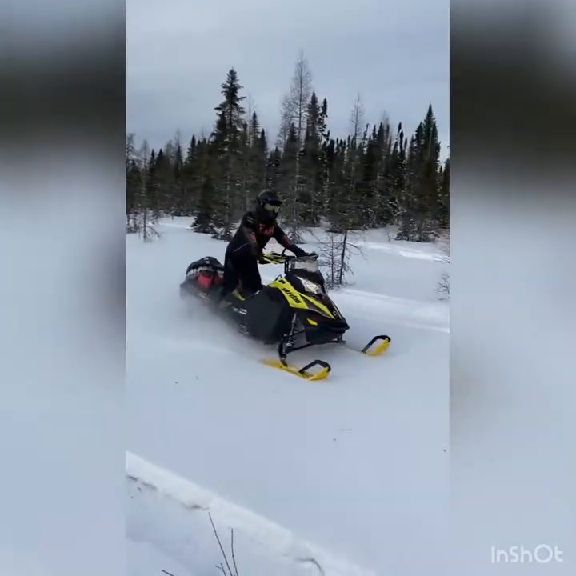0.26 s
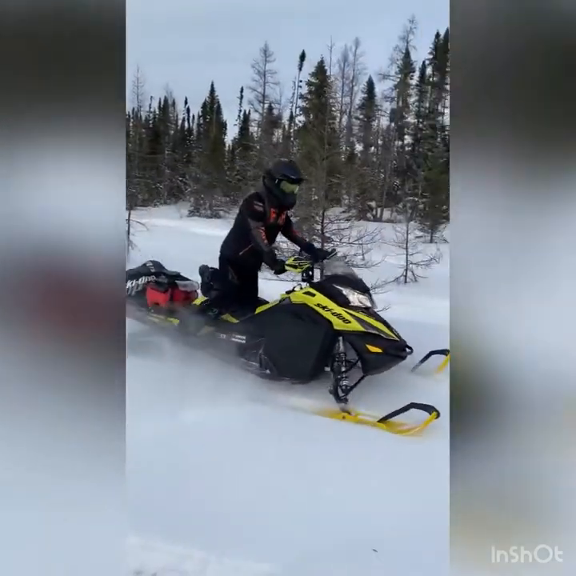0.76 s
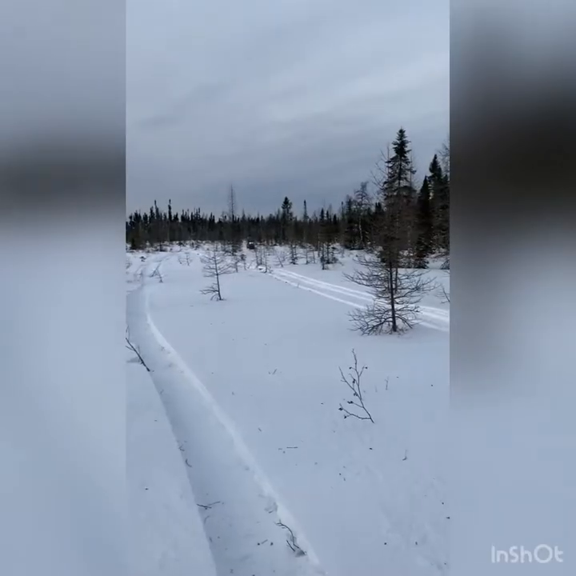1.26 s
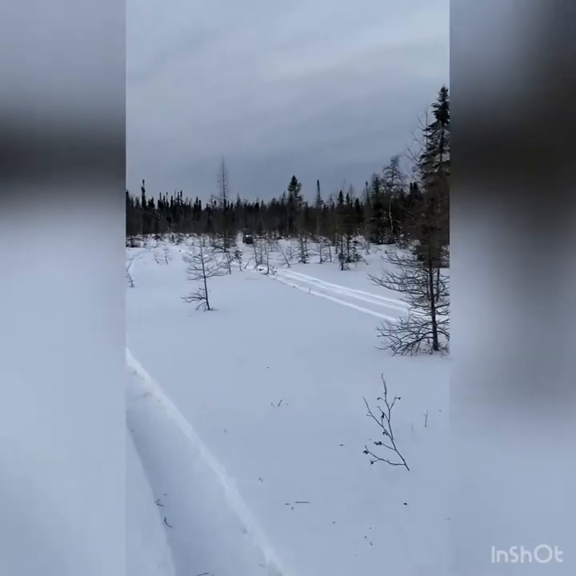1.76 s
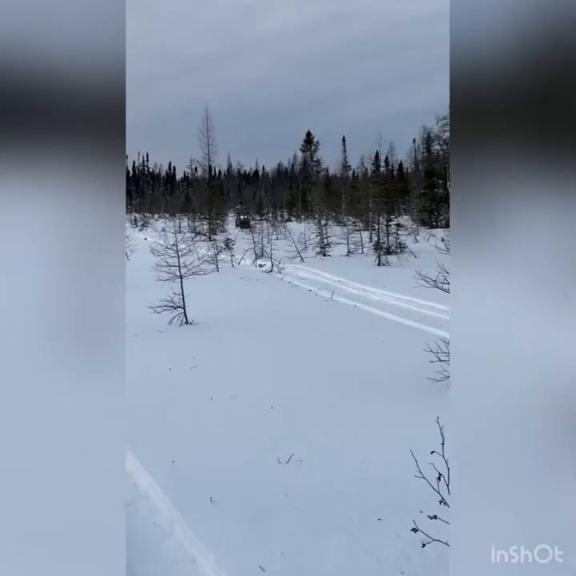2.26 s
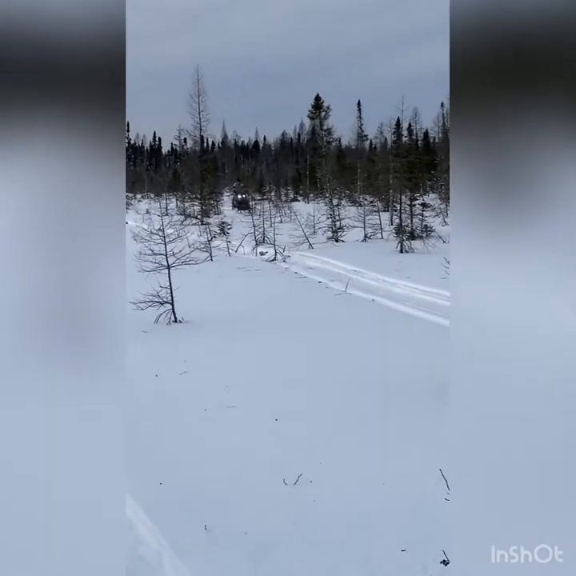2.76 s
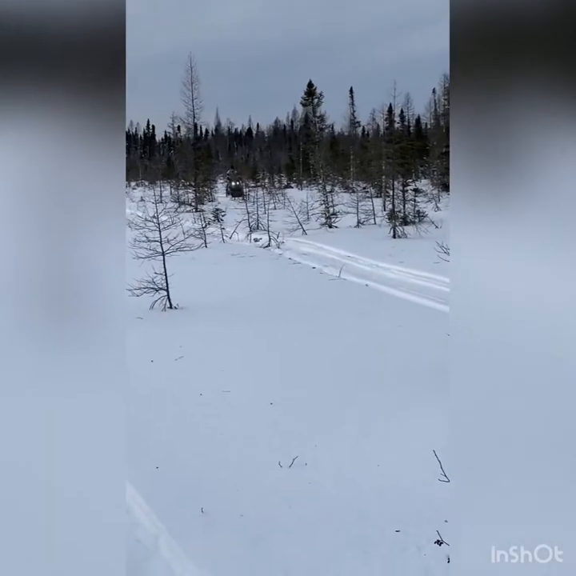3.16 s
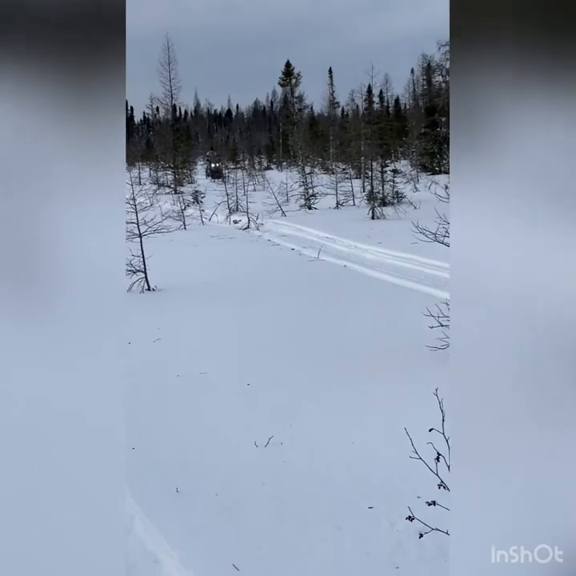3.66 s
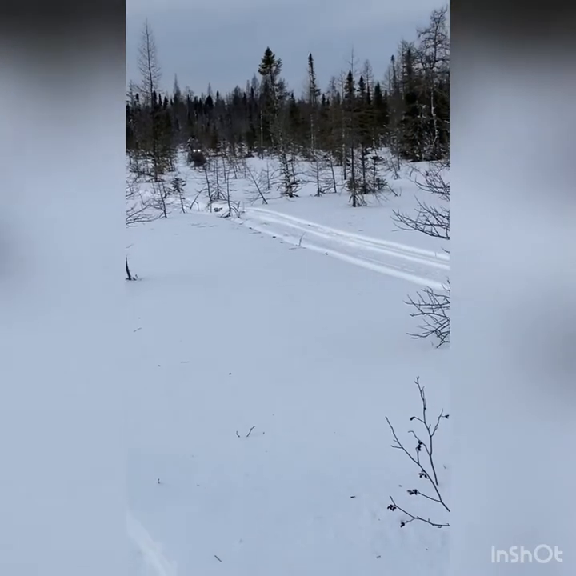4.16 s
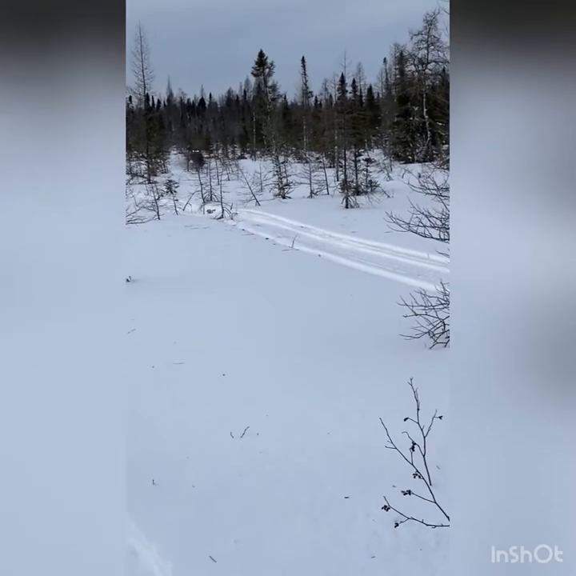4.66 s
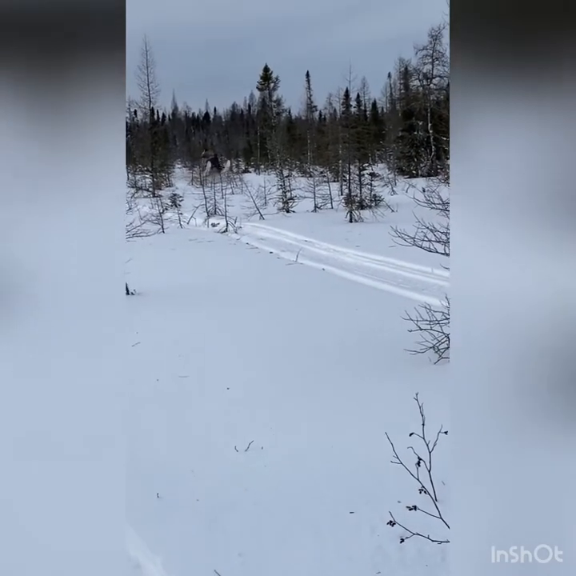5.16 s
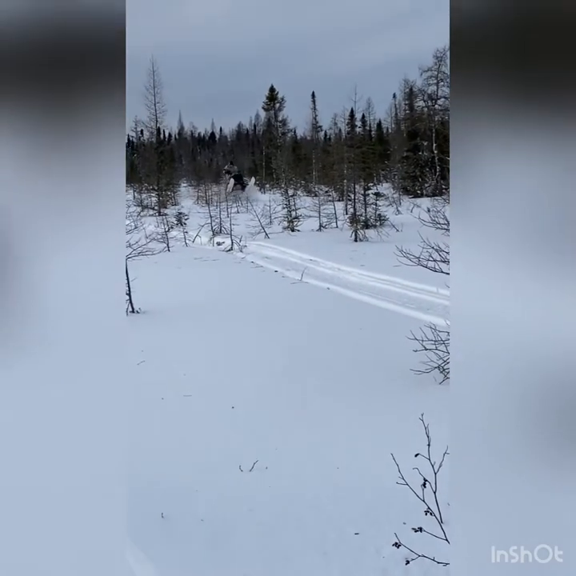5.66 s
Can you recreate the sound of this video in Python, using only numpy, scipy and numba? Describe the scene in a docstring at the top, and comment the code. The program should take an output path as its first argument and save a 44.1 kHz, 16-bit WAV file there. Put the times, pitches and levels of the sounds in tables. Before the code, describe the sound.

Handheld phone stereo in an open snowy forest clearing. From 0 to 0.9 s a snowmobile coasts by, fairly quiet: uneven low engine burble, soft rumble of track churning snow, and a faint lug whine that dips in pitch. At 0.91 s it cuts dead and a second sled idles right beside the microphones, around forty firings a second, hunting slightly: deep muffler thuds, metallic panel rattle and broad clatter, a dull bump just after the cut, scattered loose clacks until about 4.2 s, another bump near 4.8 s. Faint distant track hiss grows. Around 4.5 s the far sled comes on throttle, its pitch climbing quickly then holding as a swelling, loud, bright two-stroke howl with gritty rasp, bursts of flung snow and belt scream, while phone gain pushes the idle down. At 5.64 s the throttle snaps shut; pitch and level drop quickly, leaving a dull forest echo and the subdued idle to the end near 6 s.

```python
"""A snowmobile coasts past in deep snow: an uneven engine burble under track rumble and a faint lug whine.
Abruptly it is gone and a second sled idles right beside the phone's two microphones: firings thud in
the muffler and rattle the panels, with loose clacks and two dull bumps. Then, far off at the tree line,
the first sled opens the throttle, howls for about a second on its tuned pipe with rasp, flung snow and
belt scream, and drops away; the forest echoes it. The phone turns its gain down under the howl."""
import sys
import numpy as np
from scipy import signal
from scipy.fft import rfft, irfft, next_fast_len
from scipy.io import wavfile
from scipy.ndimage import uniform_filter1d
from numba import njit

SR = 44100
rng = np.random.default_rng(int(sys.argv[2]) if len(sys.argv) > 2 else 0)


def inscribe(sig):
    """Save sig as 16-bit PCM at rate SR to the path in sys.argv[1].

    A 1-D sig is mono; a 2-D sig holds one channel per row.
    Samples are clipped to [-1, 1] before scaling.
    """
    pcm = np.round(np.clip(np.atleast_2d(sig).T, -1, 1) * 32767)
    wavfile.write(sys.argv[1], SR, pcm.astype(np.int16))


N = 261057
T = np.arange(N) / SR  # s

CUT_S = .910  # the coasting sled stops, the idling one starts
SONG_S, SHUT_S = 4.497, 5.64  # far sled: its pipe comes on song, its throttle snaps shut
SIDES = np.array([[1], [-1]])  # left, right


def undb(db):
    """Decibels to gain."""
    return 10 ** (np.asarray(db) / 20)


def unit(x):
    """Scale to rms 1."""
    return x / np.sqrt(np.mean(x ** 2))


def curves(table):
    """Each column of a table, joined by straight lines in time."""
    s, *columns = np.transpose(table)
    return [np.interp(T, s, column) for column in columns]


def noise():
    """White noise."""
    return rng.standard_normal(N)


def walk(rate):
    """Smooth random wander with rms 1: noise averaged twice over 1/rate seconds."""
    k = int(SR / rate)
    once = uniform_filter1d(noise(), k, mode="wrap")
    return unit(uniform_filter1d(once, k, mode="wrap"))


def colour(x, points, size=16384):
    """Causal minimum-phase filter through (f/Hz, level/dB) points."""
    hz, db = np.transpose(points)
    bins_hz = np.arange(size // 2 + 1) * SR / size
    log_gain = np.log(undb(np.interp(np.log(bins_hz + 1), np.log(hz), db)))
    # folding the cepstrum puts the energy as early as it can be
    cepstrum = irfft(log_gain)[:size // 2]
    cepstrum[1:] *= 2
    impulse = irfft(np.exp(rfft(cepstrum, size)))
    return signal.fftconvolve(x, impulse)[:N]


def resonate(x, hz, width):
    """One resonance, gain 1 at its centre."""
    return signal.lfilter(*signal.iirpeak(hz, hz / width, fs=SR), x)


def burst(age, decay):
    """Envelope that starts at age 0 and dies away."""
    return (age >= 0) * np.exp(-np.abs(age) / decay)


def buzz(hz, count):
    """Steady firing pulses as a stack of equal harmonics, and their phase."""
    phase = 2 * np.pi * np.cumsum(hz) / SR
    return sum(np.cos(k * phase) for k in range(1, count + 1)), phase


def surround(envelope, spectrum):
    """Coloured noise at the two microphones: a direct part in both, a diffuse part opposed between them."""
    # share that arrives from all around: f/Hz, level/dB
    all_around = [(60, -35), (150, -6), (380, -8), (700, 3.5), (1300, -3), (2400, -3), (5000, -28.5),
                  (12000, -36)]
    direct, diffuse = (unit(colour(noise() * envelope, spectrum)) for _ in range(2))
    return direct + SIDES * colour(diffuse, all_around)


def coasting_sled():
    """Off the throttle the engine burbles unevenly under the track's rumble, whose lugs whine faintly."""
    # mean firing rate: t/s, f/Hz
    firing_rate = [(0, 62.45), (.25, 58.07), (.38, 61.54), (.48, 59.86), (.6, 61.87), (.9, 61)]
    # muffled exhaust: f/Hz, relative level/dB
    exhaust_tone = [(50, -30.5), (120, -5.5), (180, -0.5), (240, -11), (400, -26.5), (620, -30), (800, -40),
                    (2000, -32)]
    # track churning the snow: f/Hz, relative level/dB
    churn = [(25, -16), (50, 1), (120, 2), (200, 3), (320, -8.5), (600, -17), (850, -24.5), (1500, -24.5),
             (3200, -36.5), (5500, -33.5), (10000, -35.5), (16000, -52)]
    # lugs passing, lower in pitch as the sled goes by: t/s, f/Hz
    lug_rate = [(0, 123), (.1, 121), (.3, 107.5), (.42, 99), (.5, 98), (.62, 100.5), (.9, 103.5)]
    # tunnel ringing around the lugs: f/Hz, relative level/dB
    tunnel = [(150, -16), (300, 2), (400, -4), (500, -0.5), (610, 1.5), (720, -7), (850, -14), (1200, -28)]

    hz, = curves(firing_rate)
    pulses, _ = buzz(hz * (1 + 0.013 * walk(12.6)), count=24)
    exhaust = unit(colour(pulses * undb(2.0 * walk(71)), exhaust_tone))
    track = surround(undb(1.4 * walk(25)), churn)
    lugs, _ = buzz(*curves(lug_rate), count=9)
    whine = unit(colour(lugs, tunnel)) * undb(1.5 * walk(20))
    mix = undb(-0.5) * exhaust + undb(-0.5) * track + undb(-14.0) * whine
    return mix * undb(-37.5) * (T < CUT_S)


def idling_sled():
    """Every firing thuds in the muffler, then strikes the panels, each after its own lag."""
    # hunting around the idle speed: t/s, firing f/Hz
    idle_rate = [(0.91, 38.68), (1.13, 39.68), (1.64, 40.49), (1.77, 38.14), (2.14, 40.24), (2.75, 38.82),
                 (2.87, 37.14), (3.07, 40.8), (3.15, 38.47), (3.68, 40.22), (3.69, 40.6), (4.1, 40.3),
                 (5.29, 39.5), (5.65, 37.53), (5.72, 39.9), (5.92, 37.63)]
    # muffler and airbox modes: f/Hz, width/Hz, signed relative gain
    modes = [(44.3, 5.3, 0.25), (111.7, 18.4, 0.36), (170.4, 198, -0.19)]
    # panels and clutch: f/Hz, width/Hz, relative level/dB, lag after the firing/s, lag scatter/s
    panels = [(838.5, 42, -11, .0105, 0.0005), (1027, 163, -14.5, 0.012, 0.00065),
              (1689, 94, -7, .0095, .0004), (2657, 85, -10, .0145, .0006),
              (2553, 270, -14.5, 0.01, 0.00043), (3906, 120, -23.5, 0.0063, 0.00058),
              (4570, 230, -23.5, 0.012, 0.00039)]
    # broad mechanical clatter: f/Hz, relative level/dB
    clatter = [(25, -20), (55, 19.5), (100, 23.5), (200, 20), (350, 4.5), (600, 2.5), (1100, -3.5),
               (1500, -6.5), (2200, -8.5), (3200, -10.5), (4500, -18), (6000, -16.5), (8000, -20.5),
               (11000, -27.5), (16000, -42)]
    thud_db, rattle_start_db, rattle_growth_db_per_s = -13, -34, 0.43
    # the ringing moves from the thin panel to the two low ones; the low ones get the opposite dB
    shift_s, thin_before_db, thin_after_db = 3.33, 1.3, -3.5

    hz, = curves(idle_rate)
    rattle_db = rattle_start_db + rattle_growth_db_per_s * (T - CUT_S)
    thin_db = uniform_filter1d(np.where(T < shift_s, thin_before_db, thin_after_db), size=SR // 6)
    turns = np.cumsum(hz * (T >= CUT_S)) / SR
    fired = np.flatnonzero(np.diff(np.ceil(turns))) + 1  # sample of each firing
    # the two cylinders differ a little, and no two firings are alike
    force = rng.standard_normal(len(fired)) + 0.59 * (-1) ** np.arange(len(fired))

    def firings(lag, jitter, spread_db):
        """One pulse for each firing, a little late."""
        late = np.abs(lag + jitter * rng.standard_normal(len(fired)))
        return np.bincount(fired + (late * SR).astype(int), undb(spread_db * force), 2 * N)[:N]

    def flare(pulses, decay):
        """Each pulse dies away."""
        return signal.lfilter([1], [1, -np.exp(-1 / (decay * SR))], pulses)

    low_pass = signal.butter(8, 216, fs=SR, output="sos")
    puffs = signal.sosfilt(low_pass, firings(lag=0.00007, jitter=0.00004, spread_db=.5))
    thud = unit(sum(gain * resonate(puffs, centre, width) for centre, width, gain in modes))

    shake = flare(firings(lag=.0075, jitter=.0003, spread_db=1.0), decay=.025)
    steady = 0.24 * (T >= CUT_S)
    rattle = undb(7.0) * surround(steady + shake, clatter)
    for k, (centre, width, db, lag, jitter) in enumerate(panels):
        blows = firings(lag, jitter, spread_db=1.0)
        chatter = 0.069 * noise() * flare(blows, decay=0.0072)
        ring = resonate(resonate(blows + chatter, centre, width), centre, 5 * width)
        lean = (k == 2) - (k < 2)  # thin panel +1, the two low ones -1
        rattle = rattle + unit(ring) * undb(db + thin_db * lean)
    return thud * undb(thud_db) + rattle * undb(rattle_db)


def knocks():
    """Loose parts clack in short noise bursts; twice something bumps dully as a dying sine."""
    # harder clacks: t/s, relative level/dB
    clack_times = [(1.0454, -28), (1.775, -29), (1.878, -28), (2.2832, -28.5), (2.4334, -29), (2.559, -27),
                   (2.583, -30), (2.61, -30), (2.7638, -26.5), (2.8956, -33), (2.9727, -27), (3.051, -29),
                   (3.228, -26.5), (3.28, -25), (3.481, -21), (4.0085, -23.5), (4.1077, -24),
                   (4.228, -21.5)]
    # dull bumps: t/s, level/dB, f/Hz
    bump_times = [(.929, -12, 327), (4.814, -10.5, 302)]
    tone = [(300, -4), (900, 11.5), (2500, 6.5), (4500, -1.5), (7000, -9), (16000, -35)]  # f/Hz, level/dB

    chatter = unit(colour(noise(), tone))
    clacks = sum(undb(db) * burst(T - s, 0.01) for s, db in clack_times) * chatter
    bumps = sum(undb(db) * burst(T - s, 0.0033) * np.sin(2 * np.pi * hz * (T - s))
                for s, db, hz in bump_times)
    return undb(-5.0) * clacks + bumps


def rev_rate():
    """The engine runs up until the clutch holds it, and runs down once the throttle shuts."""
    # speed where the clutch holds, swaying as the track slips and grips: t/s, firing f/Hz
    clutch_rate = [(4.68, 275.9), (4.88, 279.5), (5.05, 277.8), (5.15, 282), (5.25, 276.1), (5.32, 282.3),
                   (5.43, 281.9), (5.55, 277.4), (5.635, 278.8)]
    cruise_hz, run_up_from_s, run_up_hz_per_s = 164.7, 4.31, 340
    knee_hz = 7  # softness of the clutch's hold
    run_down_to_hz, run_down_s = 132.8, 0.17

    held, = curves(clutch_rate)
    free = cruise_hz + run_up_hz_per_s * np.maximum(T - run_up_from_s, 0)
    driven = held - knee_hz * np.logaddexp(0, (held - free) / knee_hz)  # soft minimum of the two
    run_down = np.exp(-np.maximum(T - SHUT_S, 0) / run_down_s)
    return run_down_to_hz + (driven - run_down_to_hz) * run_down


def throttle(full_db, below_db, swell_s):
    """Gain that comes in fast, swells from below_db under full, drops as the throttle shuts, then fades."""
    open_db_per_s = 190
    shut_drop_db, shut_drop_s, fade_db_per_s = 15, 0.033, 82

    early, on, off = (np.maximum(age, 0) for age in (SONG_S - T, T - SONG_S, T - SHUT_S))
    swell_db = -below_db * np.exp(-on / swell_s)
    release_db = shut_drop_db * np.minimum(off / shut_drop_s, 1) ** 2 + fade_db_per_s * off
    return undb(full_db - open_db_per_s * early + swell_db - release_db)


def revving_sled():
    """The tuned pipe howls far off; gas rasps once a firing over hissing snow, and the belt screams."""
    # pipe heard across the snow, which swallows the fundamental: f/Hz, relative level/dB
    pipe = [(150, -34.5), (280, -3.5), (430, 3.5), (560, 6), (840, 5), (1120, -0.5), (1400, -1), (1680, -4),
            (1960, -10.5), (2250, -10), (3100, -19.5), (4100, -22), (5700, -21), (8000, -31)]
    # echoes off single trees, drifting as the sled moves: lag/s, level/dB
    trees = [(.0031, 2.5), (.0074, -3), (0.013, 3)]
    # gas rasp and thrown snow: f/Hz, relative level/dB
    rasp_tone = [(200, -14.5), (500, -22), (1400, 2.5), (2300, -0.5), (3200, -1), (5000, 0.5), (6500, -4.5),
                 (8000, 1), (10500, -2), (13000, -10.5), (16000, -13)]
    # snow flung up by the spinning track: t/s, relative peak level/dB, half length/s
    sprays = [(4.67, -30, 0.022), (4.824, -21.5, .022), (5.073, -19.5, 0.059), (5.23, -18.5, .03)]
    # belt drive: f/Hz, relative level/dB
    belt = [(2200, -30), (3200, -12), (4000, 0), (4800, 0), (5800, -4), (7000, -20)]
    bright_db, bright_db_per_s = -3.5, 5  # upper harmonics on coming on song, and their growth
    cruise_db, approach_db_per_s = -45.5, 10.5  # relative track hiss, growing until the throttle opens
    grip_s, thinning_db_per_s = 5.4, 5.5  # the hiss thins once the track has found grip

    hz = rev_rate()
    pulses, phase = buzz(hz * (1 + 0.0015 * walk(58)), count=28)
    howl = colour(pulses * undb(1.0 * walk(180)), pipe)
    revved = hz > np.mean([hz.min(), hz.max()])
    howl = howl / np.std(howl[revved])
    # the note brightens under load
    upper_db = bright_db + bright_db_per_s * np.maximum(T - SONG_S, 0)
    bright = signal.sosfiltfilt(signal.butter(4, 1250, "high", fs=SR, output="sos"), howl)
    howl = howl + bright * (undb(upper_db) - 1)
    # drifting echoes make the upper harmonics swell and fade one by one
    bright = signal.sosfilt(signal.butter(2, 1900, "high", fs=SR, output="sos"), howl)
    howl = howl + sum(undb(db) * np.interp(T - lag - .00012 * walk(4), T, bright) for lag, db in trees)

    cruise = undb(cruise_db - approach_db_per_s * np.maximum(SONG_S - T, 0)) * (T >= CUT_S)
    thinning = undb(-thinning_db_per_s * np.maximum(T - grip_s, 0))
    drive = np.hypot(throttle(full_db=-19, below_db=23.8, swell_s=0.21) * thinning, cruise)
    spray = sum(undb(db) * np.exp(-.5 * ((T - s) / half) ** 2) for s, db, half in sprays)
    rasp = unit(colour(noise() * (1 + 0.19 * np.cos(phase)), rasp_tone)) * undb(2.1 * walk(28))
    rasp = rasp * np.hypot(drive, spray)

    # the belt drive screams at multiples of the firing rate
    steady, _ = buzz(hz * (1 + .002 * walk(40)), count=24)
    scream = unit(colour(steady, belt)) * undb(2 * walk(10))
    scream = scream * throttle(full_db=-23.5, below_db=34, swell_s=0.26)
    return howl * throttle(full_db=-6.5, below_db=25.9, swell_s=0.64) + (rasp + scream) * undb(-4.0)


def forest(x, t60, delay):
    """Countless trunks send the sound back, late and dull, as decaying noise; the snow takes its bass."""
    tone = [(300, -15), (600, -8.0), (1100, 4), (2300, 2.0), (5000, -2.5), (10000, -26.0)]  # f/Hz, level/dB
    dull = colour(x, tone)
    tails = rng.standard_normal((2, N)) * undb(-60 * T / t60) * (1 - np.exp(-T / delay))
    return np.array([signal.fftconvolve(dull, tail / np.linalg.norm(tail))[:N] for tail in tails])


def ports(x):
    """The two microphone ports hear the bass alike and the treble out of step."""
    # phase between the ports: f/Hz, lead of the left/rad
    port_lead = [(0, 0), (1500, -.1), (2500, .35), (3700, .1), (4400, .7), (5200, .2), (6200, 1.6),
                 (7000, 3.05), (7900, 3.25), (9600, 6.1), (11300, 6.5), (13000, 9.3), (14400, 9.5),
                 (15500, 12.4)]
    # level between the ports: f/Hz, left minus right level/dB
    port_shade = [(60, 0), (120, -.6), (200, -1), (380, -2), (700, -.6), (1290, 1.5), (2400, .4), (4400, 0)]

    size = next_fast_len(N + SR)
    hz = np.arange(size // 2 + 1) * SR / size
    lead, shade_db = (np.interp(hz, *np.transpose(table)) for table in (port_lead, port_shade))
    response = undb(SIDES * shade_db / 2) * np.exp(1j * SIDES * lead / 2)
    return irfft(rfft(x, size) * response, size)[:, :N]


def scene():
    """Both sleds at the microphones, and the forest echo of the far one."""
    far = revving_sled()
    direct = ports(coasting_sled() + idling_sled() + knocks() + far)
    return direct + undb(-15) * forest(far, t60=0.87, delay=0.025)


@njit
def follow(power, attack, release):
    """Level follower that rises fast and falls slowly."""
    out, level = np.empty(len(power)), 0.
    for i in range(len(power)):
        level += (power[i] - level) / (SR * (attack if power[i] > level else release))
        out[i] = level
    return out


def record(dry):
    """The phone turns everything down while it is loud above the bass, rounds peaks and cuts the top."""
    listen_hz, threshold_db, squeeze = 349.2, -17.5, 0.7  # squeeze: dB of cut per dB over the threshold
    attack_s, release_s = 0.042, 0.94
    top_hz = 15900

    heard = signal.sosfilt(signal.butter(4, listen_hz, "high", fs=SR, output="sos"), dry)
    power = follow(uniform_filter1d(np.mean(heard ** 2, axis=0), size=512), attack_s, release_s)
    over = np.maximum(np.sqrt(np.abs(power)) / undb(threshold_db), 1)
    held = dry * over ** -squeeze
    rounded = held / (1 + (held / .95) ** 8) ** (1 / 8)
    return signal.sosfilt(signal.ellip(8, .2, 70, top_hz, fs=SR, output="sos"), rounded)


dry = scene()
out = record(dry)
inscribe(out)
```